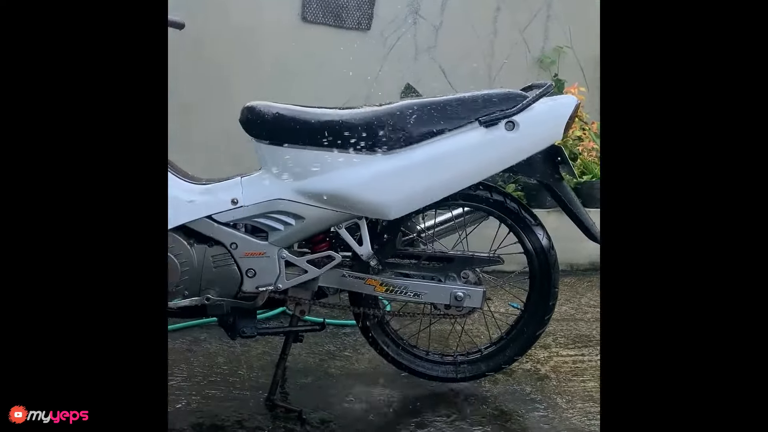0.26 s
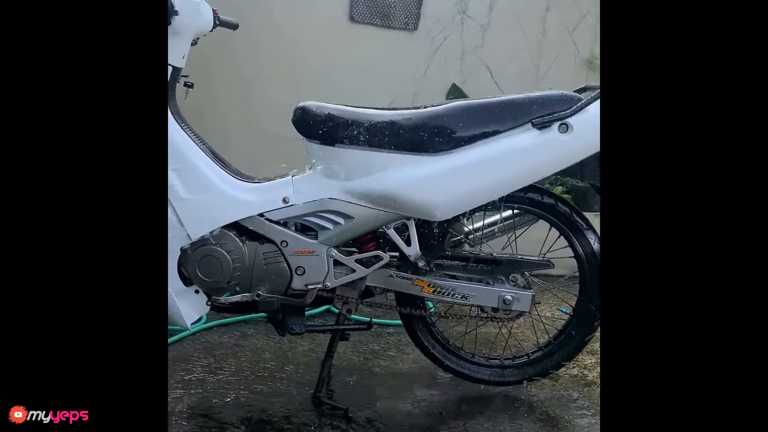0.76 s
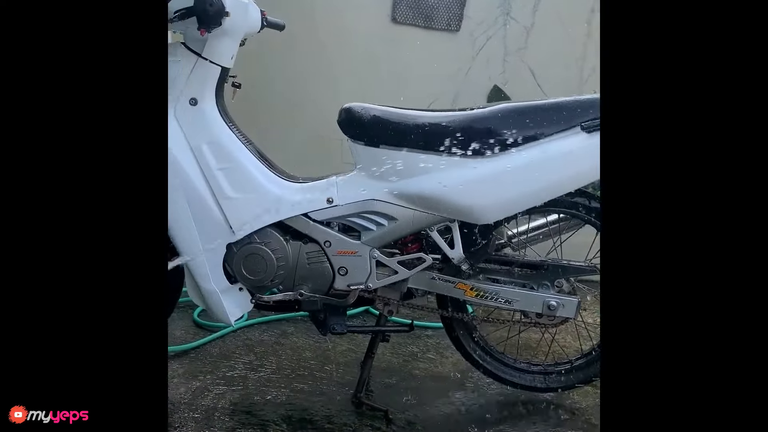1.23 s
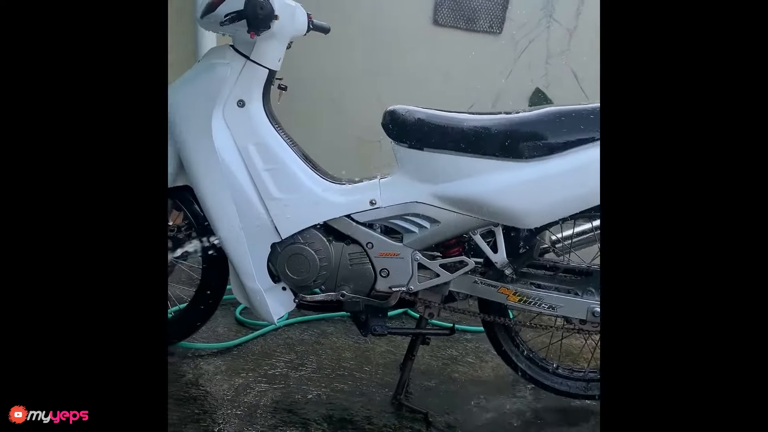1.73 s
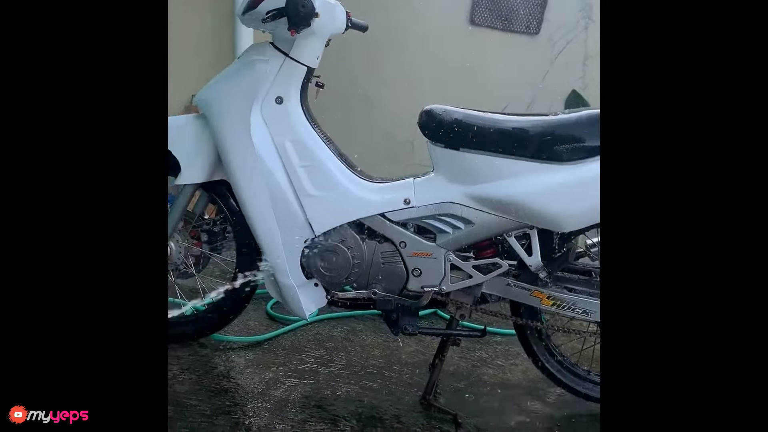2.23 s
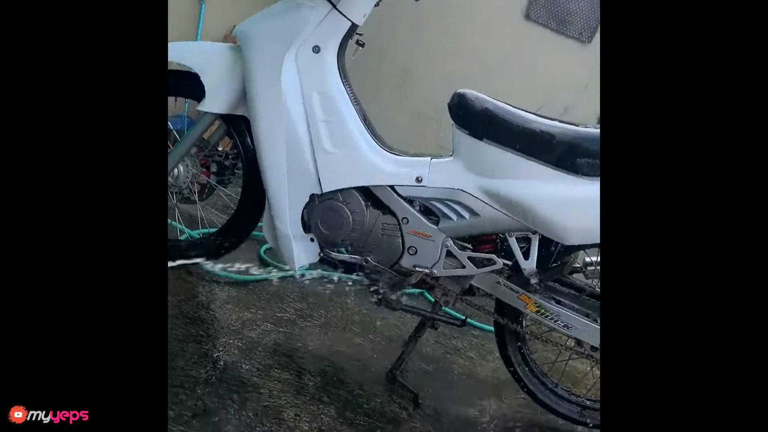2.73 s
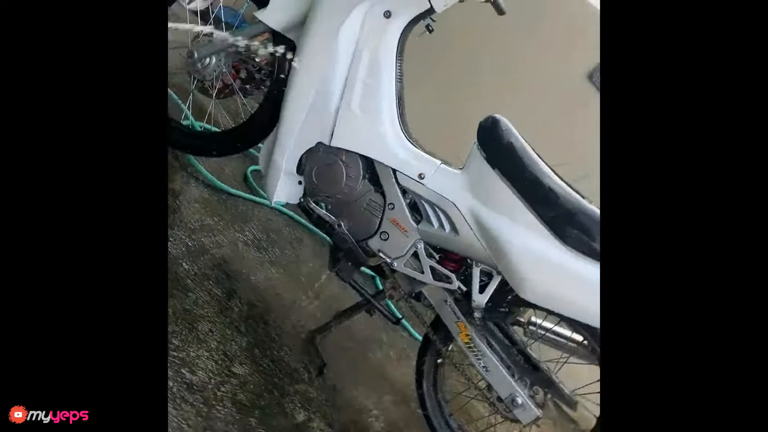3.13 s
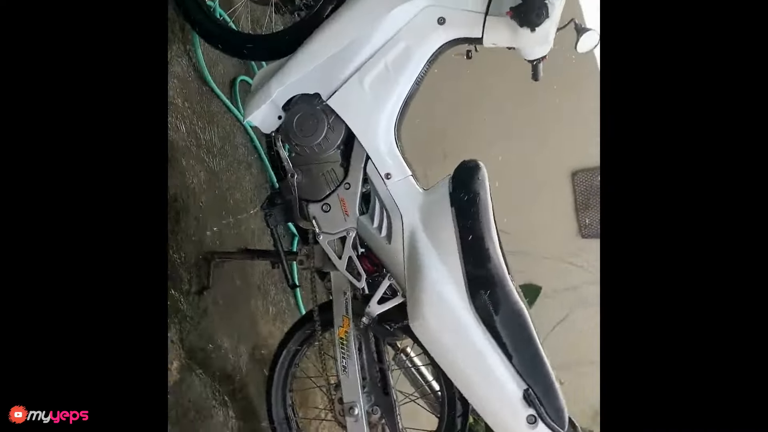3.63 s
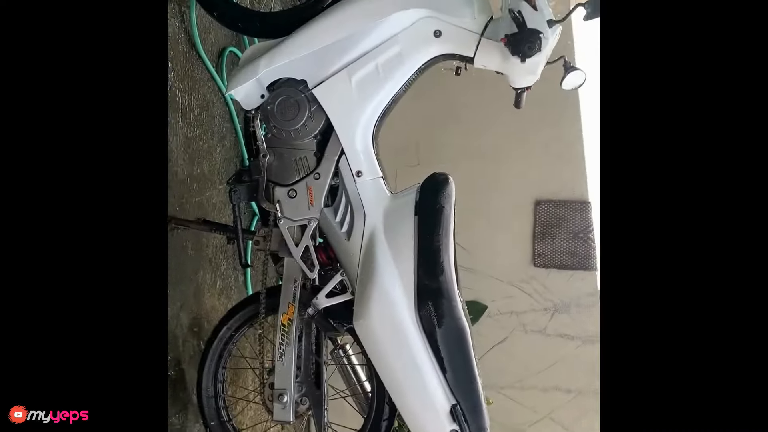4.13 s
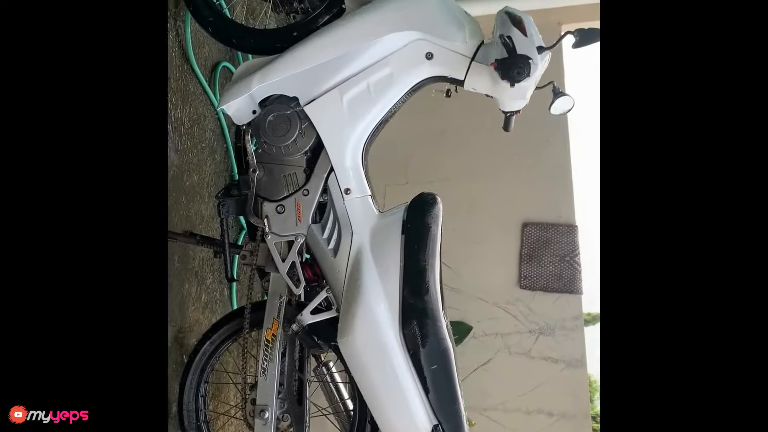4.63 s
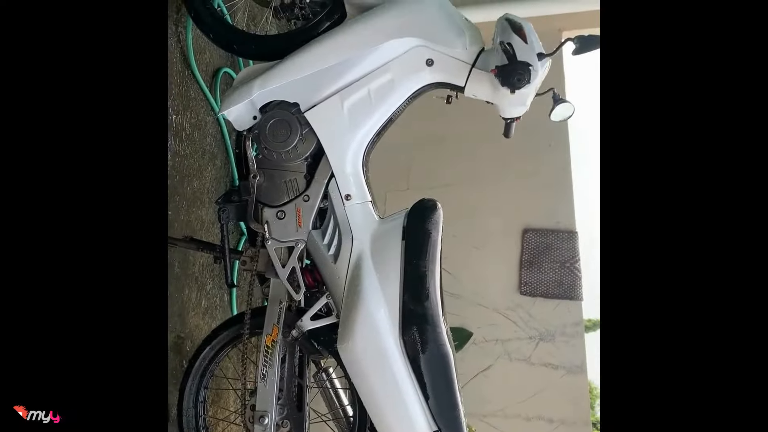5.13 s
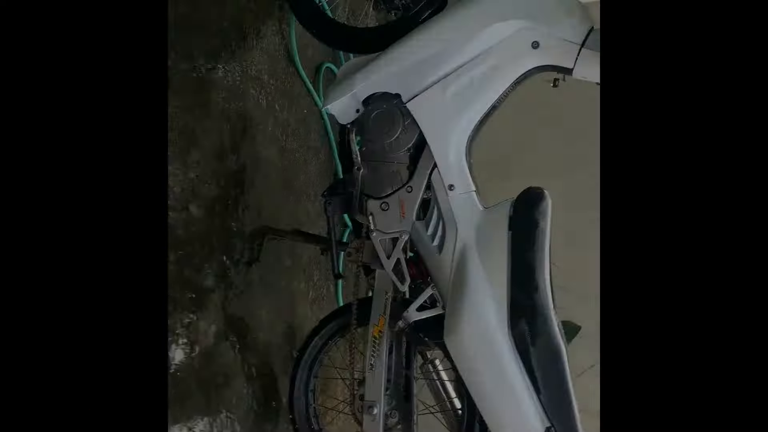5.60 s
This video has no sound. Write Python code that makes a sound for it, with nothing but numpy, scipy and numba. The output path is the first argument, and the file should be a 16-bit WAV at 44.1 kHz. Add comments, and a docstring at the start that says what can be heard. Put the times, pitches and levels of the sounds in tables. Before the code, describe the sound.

Outdoors on wet concrete, water sprays and patters continuously, swelling and thinning as the jet crosses plastic panels, metal and ground. Irregular slaps burst out of it and hollow parts ring briefly. Behind are far-off motors, a wavering low drone and soft rumble, strongest at first. A few low thuds and knocks sound nearby. Phone microphone, bright and wide, cut off suddenly.

```python
"""In a yard, a garden hose plays over a parked motorcycle, close to a phone that spreads it in stereo.
Showers of short sines are the drops: they crackle on wet paint and concrete and drum on the panels.
Noise bursts slap, narrow noise rings hollow parts, and low thuds and falling sweeps knock near by.
Some way off, sines at engine orders hum at changing revs, with a drone and a noise rumble."""
import sys
import numpy as np
from scipy import signal
from scipy.fft import rfft, irfft
from scipy.io import wavfile
from scipy.ndimage import uniform_filter1d
from numba import njit

SR = 44100
rng = np.random.default_rng(int(sys.argv[2]) if len(sys.argv) > 2 else 0)


def store_pcm(level_fs):
    """Save levels as 16-bit WAV."""
    pcm = np.round(np.clip(level_fs, -1, 1) * 32767).astype(np.int16)
    wavfile.write(sys.argv[1], SR, np.atleast_2d(pcm).T)


N = 258426
T = np.arange(N) / SR
HZ = np.maximum(np.fft.rfftfreq(2 * N, 1 / SR), 1)

# All levels in the tables are relative: each layer and the whole mix are trimmed afterwards.
# the spray as the jet wanders over the bike: (time [s], fine drops [dB], coarse drops [dB])
SPRAY_PATH = [(0, -47, -72), (.47, -41.5, -46), (.8, -36, -43), (.95, -35, -48), (1.22, -45.5, -55.5),
              (1.45, -43.5, -53), (1.76, -35.5, -49.5), (2.15, -35, -45), (2.42, -35.5, -54),
              (2.87, -41.5, -54.5), (3.15, -33.5, -37.5), (3.55, -36.5, -65), (3.8, -50, -55.5),
              (4.0, -44.5, -48), (4.25, -44.5, -45.5), (4.55, -37.5, -46), (4.85, -40, -51),
              (5.58, -41.5, -52.5), (5.86, -39, -49)]
# spectrum of the fine drops: (frequency [Hz], density [dB])
FINE_SPECTRUM = [(3000, -19), (5500, 0), (7500, 0.5), (10000, 0.5), (12000, 2.5), (14000, 2), (16000, 2)]
# spectrum of the coarse drops: (frequency [Hz], density [dB])
COARSE_SPECTRUM = [(1400, -68), (2200, -9), (2800, -6), (3800, 0.5), (4800, 6.5), (6300, -9), (8000, -24),
                   (12000, -25)]
# treble colour of the phone's microphone and stereo processing, and left-right phase of the stereo processing:
# # (frequency [Hz], width [Hz], gain [dB], left-right phase [rad])
STEREO_BANDS = [(7450, 350, -1, 1.5), (8350, 400, 3, 0), (8930, 350, -3, 2.2), (9540, 400, 2.5, -.3),
                (10400, 300, 1, -1.9), (11000, 400, -2, 0), (11550, 350, 1, 1.9), (12450, 500, 3, 0),
                (13180, 280, -2, 2.3), (13620, 350, 5, -.4), (14100, 500, -3, 0), (14600, 300, 0, -1.8)]


def undb(db):
    """Decibels to gain."""
    return 10 ** (np.asarray(db) / 20)


def unit(x):
    """Scale to rms 1."""
    return x / np.sqrt(np.mean(x ** 2))


def curves(table):
    """One value per sample for each column of a table."""
    s, *columns = np.transpose(table)
    return [np.interp(T, s, c) for c in columns]


def over_hz(points):
    """Join (Hz, value) points on a log-frequency axis."""
    hz, value = np.transpose(points)
    return np.interp(np.log(HZ), np.log(hz), value)


def filtered(x, response):
    """Apply a frequency response."""
    return irfft(rfft(x, 2 * N) * response)[..., :N]


def causal(db):
    """Minimum-phase response with the given gain, so that attacks stay sharp."""
    cepstrum = irfft(db * np.log(10) / 20)
    cepstrum[1:N] *= 2
    cepstrum[N + 1:] = 0
    return np.exp(rfft(cepstrum))


def coloured(x, points):
    """Give a sound a spectrum, at rms 1."""
    return unit(filtered(x, causal(over_hz(points))))


def bump(hz, width_hz):
    """Bell-shaped reach around one frequency."""
    return 1 / (1 + (2 * (HZ - hz) / width_hz) ** 2)


def walk(rate):
    """Random wander with a spread near 1: straight lines between `rate` random knots a second."""
    knots = rng.standard_normal(2048)
    return np.interp(T * rate, np.arange(len(knots)), knots)


def fade(t, t60):
    """Exponential decay by 60 dB in t60 seconds."""
    return np.exp(-np.log(1000) * t / max(t60, 1e-4))


def add(track, s, sound):
    """Mix a sound in at a time."""
    i = int(np.clip(s * SR, 0, N - 1))
    track[i:i + len(sound)] += sound[:N - i]


def dwell(s, length, rise, fall):
    """The jet slides onto a surface, stays, and slides off."""
    return np.interp(T, [s - rise, s, s + length, s + length + fall], [0, 1, 1, 0])


@njit
def grains(start, hz, ring_s, size, glide):
    """One damped, slightly rising sine for each drop."""
    out = np.zeros(N)
    for k in range(len(start)):
        i, n = int(start[k] * SR), int(5 * ring_s[k] * SR) + 2
        w = 2 * np.pi * hz[k] / SR
        # a rotating phasor: each step turns and damps it, and the turn itself grows
        phasor = size[k] + 0j
        step = np.exp(1j * w - 1 / (ring_s[k] * SR))
        rise = np.exp(1j * w * glide / n)
        for j in range(i, min(i + n, N)):
            phasor *= step
            step *= rise
            out[j] += phasor.imag
    return out


def drops(lo_hz, hi_hz, ring_s, spread_db, slugs_db, count):
    """A shower of drops of scattered size and pitch that arrives in slugs; the mean flow is even."""
    when, pitch, ring, chance = rng.random((count, 4)).T
    size = undb(spread_db * np.minimum(-np.log(1 - chance), 5))
    hz = lo_hz + pitch * (hi_hz - lo_hz)
    rings_s = ring_s * 2 ** (2 * ring - 1)  # from half to double
    x = grains(when * N / SR, hz, rings_s, size, 0.015)  # glide as a share of the pitch
    x = x * undb(slugs_db)
    flow = uniform_filter1d(uniform_filter1d(x ** 2, size=3000), size=2000)
    return x / np.sqrt(np.abs(flow) + 1e-9)


def slug_flow(count):
    """Level in dB of a flow that comes in sudden slugs, each dying away quickly, over an even mist."""
    slug_s, mist_power = 0.004, 1.2  # decay of a slug; mist power as a ratio to that of the slugs
    when, size = rng.random((count, 2)).T
    hits = np.bincount((when * N).astype(int), size ** 2, N)
    power = signal.lfilter([1], [1, -np.exp(-1 / (slug_s * SR))], hits)
    return 10 * np.log10(mist_power + power / power.mean())


def spray():
    """Fine drops crackle, coarse ones splatter lower; they come in slugs, each size a little on its own."""
    # the jet hits a surface squarely: (time [s], length [s], fine drops [dB], coarse drops [dB])
    gushes = [(0.25, 0.11, -43, -48.5), (0.687, 0.048, -39.5, -42), (1.158, 0.087, -59, -48.5),
              (1.977, 0.081, -34.5, -44), (2.467, 0.033, -33, -63), (2.671, 0.038, -36.5, -46.5),
              (2.89, .1, -60, -55), (2.942, 0.02, -33, -52), (3.485, 0.031, -43, -39.5),
              (3.625, 0.077, -39.5, -42.5), (4.062, 0.044, -45.5, -47), (4.345, 0.034, -38, -39),
              (4.648, 0.091, -43, -46), (5.001, 0.03, -40, -59), (5.336, 0.036, -40.5, -46),
              (5.724, 0.048, -38.5, -50)]
    edge_s = 0.027
    fine_gain, coarse_gain = undb(curves(SPRAY_PATH))
    for s, length, fine_db, coarse_db in gushes:
        gush = dwell(s, length, edge_s, edge_s)
        fine_gain = np.hypot(fine_gain, undb(fine_db) * gush)
        coarse_gain = np.hypot(coarse_gain, undb(coarse_db) * gush)

    slugs_db = slug_flow(count=800)
    mist_db = 0.89 * slugs_db + 1.0 * walk(130)
    fine_db = slugs_db + 1.5 * walk(90)
    coarse_db = slugs_db + 1.7 * walk(90)
    mist = drops(9820, 14800, ring_s=0.00028, spread_db=-1.0, slugs_db=mist_db, count=24000)
    fine = drops(3900, 10590, ring_s=0.0016, spread_db=1.8, slugs_db=fine_db, count=11000)
    coarse = drops(1840, 8770, ring_s=0.0012, spread_db=1.6, slugs_db=coarse_db, count=14000)
    crackle = undb(0.57) * fine_gain * coloured(mist + fine, FINE_SPECTRUM)
    splatter = undb(1.2) * coarse_gain * coloured(coarse, COARSE_SPECTRUM)
    return crackle + splatter


def drumming():
    """Heavy drops drum in a dense wash that rings the panels, and trap many small bubbles in the run-off."""
    # run-off pattering on the ground: (time [s], level [dB])
    runoff_levels = [(0, -49.5), (1.15, -56), (1.4, -54.5), (2.4, -58.5), (3.05, -60.5), (3.65, -52.5),
                     (4.55, -52), (4.9, -64.5), (5.86, -64)]
    # the jet crosses a panel: (time [s], length [s], level [dB], deep part against it [dB], rise [s])
    passes = [(0.1, 0.15, -50.5, 3.5, 0.046), (0.254, 0.28, -52.5, -6, .05),
              (0.638, 0.33, -48.5, -2, 0.059), (1.547, 0.28, -50.5, 0, 0.055),
              (1.974, 0.33, -47.5, 2.5, 0.18), (2.523, 0.12, -54, -22, 0.056),
              (2.854, 0.11, -45, -5, 0.019), (3.17, 0.16, -45, 4.5, 0.049), (3.365, 0.2, -47, 3, 0.056),
              (3.539, 0.1, -44.5, -3, 0.051), (4.28, 0.13, -51, -15, 0.038),
              (4.341, 0.032, -39.5, -10.5, 0.016), (4.414, .2, -57.5, 0, .04),
              (5.823, 0.12, -54.5, -3, 0.077)]
    # spectrum of the panel wash: (frequency [Hz], density [dB])
    panel_spectrum = [(300, -8), (550, 2.5), (700, 1), (1000, -2), (1350, -3.5), (1700, -5), (2100, -6),
                      (3000, -2), (5000, -17.5)]
    # spectrum of the deep drumming: (frequency [Hz], density [dB])
    deep_spectrum = [(100, -16.5), (200, 1), (260, 5.5), (310, 3), (390, 3.5), (520, 3), (700, -1),
                     (1200, -19)]
    # resonances of the wet bodywork: (frequency [Hz], width [Hz], gain [dB])
    bodywork = [(381, 22, 7), (459, 32, 4), (850, 45, 3), (1103, 45, 5), (1264, 60, 5), (1575, 80, 5),
                (1765, 55, 5)]
    gain = undb(curves(runoff_levels)[0])
    deep_gain = gain * undb(-3.5)
    for s, length, db, deep_db, rise in passes:
        on_panel = undb(db) * dwell(s, length, rise, fall=0.044)
        gain = np.hypot(gain, on_panel)
        deep_gain = np.hypot(deep_gain, on_panel * undb(deep_db))

    slugs_db = 1.1 * walk(60)
    panels = drops(400, 4000, ring_s=0.002, spread_db=2.2, slugs_db=slugs_db, count=14000)
    bubbles = drops(480, 2200, ring_s=0.018, spread_db=3.4, slugs_db=slugs_db, count=1800)
    deep = drops(140, 1000, ring_s=0.01, spread_db=2.0, slugs_db=slugs_db, count=7000)
    wash = gain * undb(3.0) * coloured(panels + undb(-2.5) * bubbles, panel_spectrum)
    wash = wash + deep_gain * undb(2.5) * coloured(deep, deep_spectrum)
    resonance_db = sum(db * bump(hz, width) for hz, width, db in bodywork)
    return undb(-2.0) * filtered(wash, causal(resonance_db))


def engine(run, orders):
    """Only the lowest orders of an exhaust carry this far; each swells as it crosses a resonance of the yard."""
    # standing waves between the yard walls favour some pitches: (frequency [Hz], gain [dB])
    yard = [(45, -6), (52, -4.5), (56, 7.5), (60, -3.5), (68, 5), (76, -0.5), (84, 3.5), (94, 7),
            (104, 3.5), (111, -5.5), (118, 5.5), (128, -5), (136, 1), (144, -9), (152, -4), (165, -13),
            (200, -22)]
    hz, level_db = curves(run)
    turns = np.cumsum(hz * (1 + 0.001 * walk(30))) / SR
    hum = 0
    for k, db in orders:
        yard_db = np.interp(k * hz, *np.transpose(yard))
        waver_db = 0.7 * walk(20)
        tone = np.sin(2 * np.pi * (round(k) * turns + rng.random()))
        hum = hum + undb(level_db + db + yard_db + waver_db) * tone
    return np.sqrt(2) * hum


def drone(hz=121):
    """A far motor holds one wavering note, its fourth order, with the fifth order above it."""
    # the drone comes and goes: (time [s], level [dB])
    drone_levels = [(0, -44), (.55, -50), (.8, -43), (1.3, -48), (1.8, -40), (2.1, -62), (2.85, -62),
                    (3.25, -43), (3.55, -53), (3.8, -46), (4.2, -51), (4.45, -44), (4.7, -66), (5.86, -72)]
    turns = np.cumsum(hz * (1 + 0.0072 * walk(8.3))) / SR
    waver_db = 1.5 * walk(10)
    tone = np.sin(2 * np.pi * turns) + undb(-8.5) * np.sin(2 * np.pi * turns * 5 / 4)
    return np.sqrt(2) * undb(curves(drone_levels)[0] + waver_db) * tone


def rumble():
    """Noise shaped to the bass rumbles unevenly under the engines."""
    # strength of the rumble: (time [s], level [dB])
    rumble_levels = [(0, -35), (.17, -33), (.35, -41), (1.2, -45), (2.1, -50), (2.7, -55), (3.3, -44),
                     (3.85, -45), (4.1, -53), (4.4, -50), (4.9, -56), (5.86, -57)]
    # spectrum of the rumble: (frequency [Hz], density [dB])
    rumble_spectrum = [(20, -15), (35, -11), (55, -7), (75, -4), (100, -6), (125, -4.5), (160, -7),
                       (220, -12), (290, -16), (400, -34), (1000, -42)]
    return coloured(rng.standard_normal(N), rumble_spectrum) * undb(curves(rumble_levels)[0])


def motors():
    """Two engines some way off and a drone over the rumble."""
    # an engine is blipped and runs down to idle: (time [s], cycle rate [Hz], level [dB])
    revving = [(0, 32.34, -32.5), (.11, 36.56, -20), (.19, 40.62, -36), (.33, 38.86, -25.5),
               (.5, 34.14, -31.5), (.67, 31.1, -32.5), (.83, 26.98, -34), (1.02, 23.77, -37.5),
               (1.3, 25.53, -49), (1.52, 25.69, -34.5), (1.74, 25.6, -34.5), (1.88, 26, -43.5),
               (2.05, 25.65, -78)]
    # its orders: (multiple of the cycle rate, level [dB])
    revving_orders = [(2, -7.5), (3, -2.5), (4, -1.5), (5, -5.5)]
    # another hums on, stepping between two speeds: (time [s], cycle rate [Hz], level [dB])
    humming = [(0, 27.6, -30.5), (.35, 26.84, -44), (.85, 26.66, -39), (1.3, 26.6, -39),
               (1.42, 30.64, -38.5), (1.82, 30.68, -39.5), (1.95, 30.6, -31.5), (2.25, 29.74, -30.5),
               (2.48, 29.4, -33.5), (2.6, 28.55, -38.5), (2.95, 28.38, -35.5), (3.1, 25.6, -38),
               (3.48, 25.8, -43), (3.65, 25.7, -48), (4.03, 24.77, -53), (4.25, 25.68, -41),
               (4.4, 29.94, -38), (4.56, 29.7, -41), (4.65, 25.84, -38.5), (4.86, 25.9, -35),
               (5.0, 27.57, -39.5), (5.15, 29.2, -37.5), (5.5, 29.8, -34.5), (5.86, 30.6, -34.5)]
    # its orders: (multiple of the cycle rate, level [dB])
    humming_orders = [(2, -6), (3, -15), (4, -1.5), (5, -7), (6, -7)]
    engines = engine(revving, revving_orders) + engine(humming, humming_orders)
    return undb(-2.5) * engines + drone() + rumble()


def light_slaps(count=40):
    """Small slugs break off the jet at random times; their level follows the fine spray around them."""
    when, *chance = rng.random((count, 4)).T
    when = when * T[-1]
    size, coarse, pitch = (2 * np.array(chance) - 1) * np.sqrt(3)  # even scatter with a spread of 1
    db = np.interp(when, T, curves(SPRAY_PATH)[0]) - 1.5 + 1.5 * size
    return list(zip(when, db, -8.5 + 5 * coarse, 8800 * (1 + 0.25 * pitch)))


def slaps():
    """A slug bursts: a sharp crack, tiny bubbles clustered around one pitch, then a patter of fragments."""
    # slaps at set times, strong and weak:
    # (time [s], onset level [dB], coarse part against it [dB], mid pitch of bubbles [Hz])
    timed_slaps = [(0.0454, -39, -20, 9050), (0.1661, -37.5, -24, 9750), (0.2119, -29, -12, 12200),
                   (0.2784, -40, -16, 9000), (0.2914, -34.5, -3, 12320), (0.3113, -44, 6, 6050),
                   (0.4637, -31, -30, 12300), (0.5211, -29.5, -13, 13570), (0.5479, -35, -22, 13300),
                   (0.5712, -41, -9, 9100), (0.6361, -41, 5, 5920), (0.6628, -35, -20, 13570),
                   (0.6782, -28, -6, 13500), (0.7353, -36, 1, 5900), (0.7507, -34, -24, 11220),
                   (0.8082, -30.5, -5, 6070), (0.8152, -30, -2, 5710), (0.8885, -27, -27, 13920),
                   (0.894, -31, -24, 7840), (0.9333, -38, -1, 12700), (1.0114, -45, -24, 12000),
                   (1.0887, -34.5, -24, 8690), (1.1012, -34, -27, 11030), (1.1673, -42.5, 6.5, 7960),
                   (1.3377, -33, -3, 5440), (1.4086, -36, -24, 11920), (1.4874, -34, -24, 11420),
                   (1.4961, -41, -20, 10950), (1.511, -32.5, -22, 7920), (1.6418, -40.5, 1, 6990),
                   (1.6661, -30, -8, 9700), (1.7122, -28, -16, 6620), (1.7275, -26, -11.5, 10500),
                   (1.7922, -42, -22, 14840), (1.991, -33, -16, 11340), (2.0325, -31, -24, 13300),
                   (2.1425, -26, -5, 5900), (2.2233, -27, -20, 13900), (2.2838, -34.5, -5.5, 8050),
                   (2.3277, -26.5, -12, 8570), (2.3485, -28, -20, 11530), (2.3645, -30, -32, 12500),
                   (2.5753, -30, -24, 11000), (2.6204, -37, -24, 9960), (2.6318, -27.5, -7, 11350),
                   (2.6484, -25.5, -11.5, 6930), (2.6995, -33, -24, 10100), (2.7256, -28.5, -29, 11780),
                   (2.7324, -26.5, -30, 14800), (2.7939, -27.5, -33, 13800), (2.8095, -29, -22, 11900),
                   (2.9533, -28.5, -24, 7540), (2.9612, -31, -24, 12000), (2.9748, -23, -15, 12130),
                   (3.0191, -44, -16, 8910), (3.0703, -31.5, -7, 8110), (3.0972, -29, -24, 15500),
                   (3.1101, -28, -18, 7080), (3.1209, -39, -4, 7000), (3.1334, -39, -4, 7000),
                   (3.1411, -31, -24, 7270), (3.2057, -27.5, -10, 10200), (3.2854, -28.5, -24, 8080),
                   (3.3578, -35.5, -3, 12800), (3.4203, -29.5, -4.5, 8100), (3.6134, -29.5, -19, 11090),
                   (3.6721, -37, 3.5, 12200), (3.7934, -38, -24, 8270), (3.9135, -34, -26, 8700),
                   (3.9398, -33.5, -24, 9960), (3.964, -33.5, -4, 7470), (4.0378, -39, -11, 7900),
                   (4.1153, -34.5, -4.5, 9600), (4.1768, -35.5, -17, 11800), (4.2204, -48, 13, 5600),
                   (4.3398, -32, -9, 13460), (4.3726, -24.5, -25, 9400), (4.3911, -31, -3, 6030),
                   (4.4642, -31.5, -24, 10520), (4.5169, -31, -22, 9920), (4.5771, -27, -25, 12220),
                   (4.5858, -28, -28, 11690), (4.6683, -33, -24, 15000), (4.7082, -27.5, -21, 12200),
                   (4.7307, -32.5, -24, 8100), (4.8237, -35, -26, 12300), (4.8923, -32.5, -27, 12520),
                   (4.9284, -33, -28, 9240), (4.9353, -32, -14, 11000), (4.968, -34.5, -22, 10030),
                   (4.9757, -40, -22, 10000), (5.0036, -31.5, -22, 9600), (5.1156, -33, -9, 6730),
                   (5.1195, -32, -11, 7000), (5.138, -32, -13, 12160), (5.2434, -35.4, -6, 12610),
                   (5.2561, -30.5, -7, 11700), (5.2733, -35.5, -27, 6300), (5.2971, -31, -24, 11920),
                   (5.3179, -32.5, -24, 10500), (5.3426, -30.5, -18, 11860), (5.4619, -31, -28, 11070),
                   (5.478, -45, -20, 10930), (5.5404, -31, -13, 11890), (5.6496, -36.2, -24, 11500),
                   (5.6905, -36, -5, 7970)]
    crack_t60_s, patter_t60_s, bubble_t60_s = 0.014, 0.065, 0.018
    high, low, t = np.zeros(N), np.zeros(N), T[:4096]
    envelope = fade(t, crack_t60_s) + 0.3 * fade(t, patter_t60_s)
    for s, db, low_db, hz in list(timed_slaps) + light_slaps():
        burst = rng.standard_normal((2, len(t))) * envelope
        detune, phase = rng.random((2, 4, 1))
        bubble_hz = hz * (1 + 0.17 * (detune - 0.5))
        cluster = np.sin(2 * np.pi * (bubble_hz * t + phase)).sum(axis=0)
        burst[0] += undb(-3) * cluster * fade(t, bubble_t60_s)
        # the level is that of the first 128 samples
        burst *= undb(db) / np.sqrt(np.mean(burst[:, :128] ** 2, axis=1, keepdims=True))
        add(high, s, burst[0])
        add(low, s, burst[1] * undb(low_db))
    crack = filtered(high, causal(over_hz(FINE_SPECTRUM) - 1))
    splat_db = over_hz(COARSE_SPECTRUM) + over_hz([(2200, -10.5), (4000, 2.5)])
    return undb(5) * crack + undb(8.5) * filtered(low, causal(splat_db))


def hollow():
    """Drops keep a panel or cavity ringing while the jet plays on it; the running water bends its pitch."""
    # the jet dwells on a hollow part: (time [s], length [s], level [dB], middle pitch [Hz])
    hollow_parts = [(.049, 1, -44.5, 248), (0.674, 0.33, -44.5, 729), (.69, 0.2, -51, 1120),
                    (0.865, 0.1, -40, 227), (1.678, 0.13, -41.5, 753), (1.68, 0.1, -52.5, 1264),
                    (1.95, 0.47, -41, 214), (1.96, 0.35, -52.5, 1790), (2.443, 0.14, -50, 850),
                    (2.461, 0.11, -49, 1390), (2.861, 0.14, -48.5, 1666), (3.053, 0.025, -48, 830),
                    (3.053, 0.035, -44.5, 1497), (3.12, 0.4, -51.5, 1695), (3.95, 0.23, -50, 852),
                    (4.283, 0.058, -45, 2720), (4.33, 0.064, -41, 727), (4.332, 0.072, -40.5, 1117),
                    (4.34, 0.054, -44, 1480), (4.448, 0.16, -43, 787), (4.61, 0.044, -39, 286),
                    (4.72, 0.16, -53.5, 1310), (5.75, 0.13, -44.5, 775), (5.75, 0.11, -59.5, 1552)]
    wander, ring_width = 0.025, 0.14  # shares of the pitch
    out, t = np.zeros(N), T[:20000]
    for s, length, db, hz in hollow_parts:
        # slow noise turned around the pitch makes a narrow band
        b, a = signal.butter(2, np.clip(hz * ring_width / 2, 3, 500), fs=SR)
        noise = rng.standard_normal((2, len(t) + 4000))
        cos_part, sin_part = signal.lfilter(b, a, noise)[:, 4000:]  # skip the filter's start
        angle = 2 * np.pi * np.cumsum(hz * (1 + wander * walk(19.5)[:len(t)])) / SR
        ring = unit(cos_part * np.cos(angle) + sin_part * np.sin(angle))
        envelope = np.interp(t / length, [0, 0.2, 0.7, 1.15], [0.8, 1.0, 0.76, 0.034])
        add(out, s, undb(db) * ring * envelope)
    return out


def thuds():
    """Low thuds swell for a cycle or two and die away."""
    # the thuds: (time [s], pitch [Hz], level [dB], t60 [s])
    thud_list = [(0.139, 77, -2.5, 0.19), (2.862, 59, -6.5, 0.091), (2.948, 96, -15, 0.082),
                 (3.845, 106.3, -10, 0.049)]
    out, t = np.zeros(N), T[:12000]
    for s, hz, db, t60 in thud_list:
        add(out, s, -undb(db) * np.sin(2 * np.pi * hz * t) * fade(t, t60) * (1 - fade(t, t60)))
    return out


def knocks():
    """Each knock sweeps down in milliseconds, as bending waves do in a thin panel, and rings briefly."""
    # dull knocks, whose high notes run ahead of the low: (time [s], sweep peak [dB], starting pitch [Hz])
    knock_list = [(2.7989, -30, 1000), (2.8505, -28.5, 2400), (2.852, -24, 850), (2.9395, -27.5, 2170),
                  (2.942, -23, 750), (3.845, -31, 620), (3.851, -28.5, 590), (3.872, -32, 640),
                  (3.898, -30, 590), (3.916, -36, 600)]
    # what the knocks ring with, before detuning: (frequency [Hz], t60 [s], level [dB])
    modes = [(132.1, 0.025, 4.5), (335, 0.031, -26), (548, 0.1, 1), (860, 0.037, -16), (1305, 0.0089, -20),
             (1704, 0.062, 7), (2290, .008, -18)]
    end_hz, fall_s, sweep_t60_s = 170, 0.0032, 0.04
    out, t = np.zeros(N), T[:12000]
    for s, db, top_hz in knock_list:
        detune = 1 + 0.068 * rng.standard_normal(len(modes))
        ring = np.zeros(len(t))
        for (hz, t60, mode_db), d in zip(modes, detune):
            strength = undb(mode_db) / (1 + (hz / top_hz) ** 3)  # a lower start excites less treble
            ring += strength * np.sin(2 * np.pi * hz * d * t) * fade(t, t60)
        sweep_hz = end_hz + (top_hz - end_hz) * np.exp(-t / fall_s)
        sweep = np.sin(2 * np.pi * np.cumsum(sweep_hz) / SR)
        sweep *= fade(t, sweep_t60_s) * (1 - fade(t, 0.0021))
        add(out, s, undb(db) * (sweep / np.abs(sweep).max() + undb(-5) * ring / np.abs(ring).max()))
    return out


def washing():
    """Everything that sounds at the bike."""
    return spray() + drumming() + slaps() + hollow() + thuds() + knocks()


def scene():
    """Water is ahead and to the sides, spread between left and right by the phone; the motors are central."""
    # phase by which the left channel leads: (frequency [Hz], phase [rad])
    stereo_phase = [(450, .15), (750, 1.2), (1500, .5), (2300, 2.2), (3300, 1.2), (4000, 1.9), (4700, 3.1),
                    (5400, 4.5), (6000, 5.4), (7000, 6.28), (16000, 6.28)]
    # share of the water sound that comes from the sides: (frequency [Hz], level [dB])
    side_share = [(300, -12), (600, -4), (1500, -5), (2500, -5), (4000, -5), (6000, -6.5), (16000, -6.5)]
    sides = np.array([[1], [-1]])
    apart = 1 / (1 + (420 / HZ) ** 6)  # the bass stays the same left and right
    band_phase = sum(shift * bump(hz, width) for hz, width, db, shift in STEREO_BANDS)
    phase = apart * (over_hz(stereo_phase) + band_phase)
    ahead = filtered(washing(), np.exp(0.5j * sides * phase))
    # a second, independent washing, opposite in left and right
    around = filtered(washing(), apart * undb(over_hz(side_share)))
    return undb(-3.0) * (ahead + sides * around) + motors()


def record(dry):
    """The phone's microphone resonances and its stereo processing colour the treble, and the top is cut."""
    treble_db = sum(db * bump(hz, width) for hz, width, db, shift in STEREO_BANDS)
    lowpass = signal.ellip(12, 0.2, 80, 15850, fs=SR, output="sos")  # edge in Hz
    return signal.sosfilt(lowpass, filtered(dry, causal(treble_db)))


dry = scene()
out = record(dry)
store_pcm(out)
```